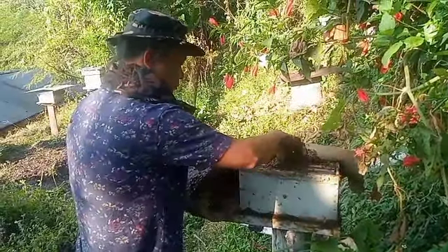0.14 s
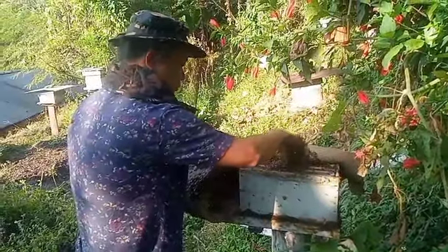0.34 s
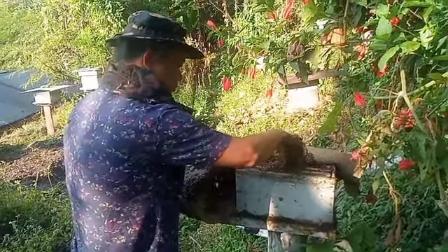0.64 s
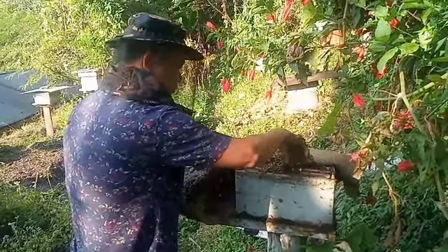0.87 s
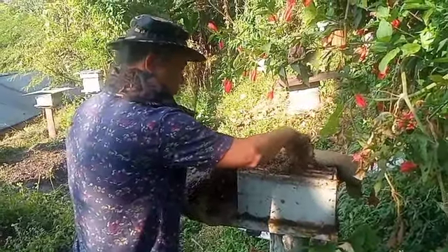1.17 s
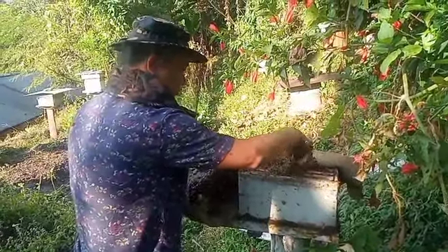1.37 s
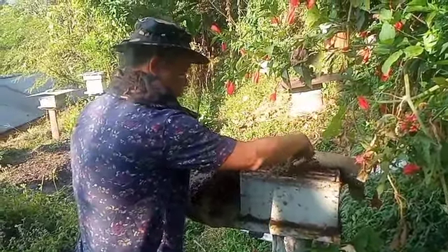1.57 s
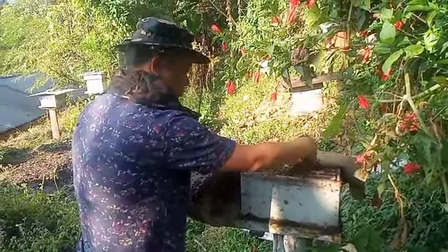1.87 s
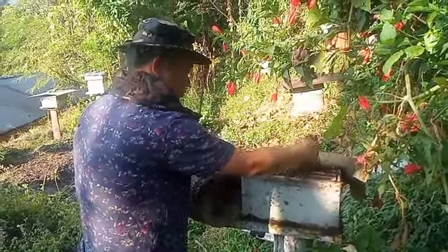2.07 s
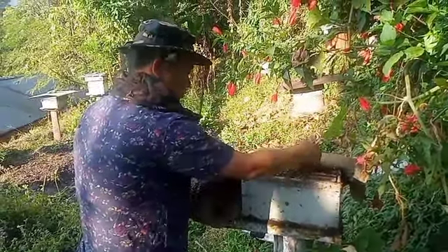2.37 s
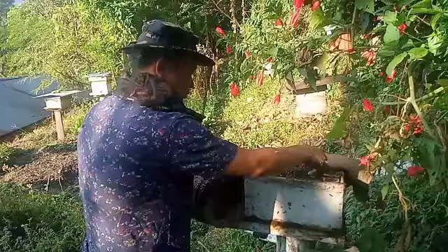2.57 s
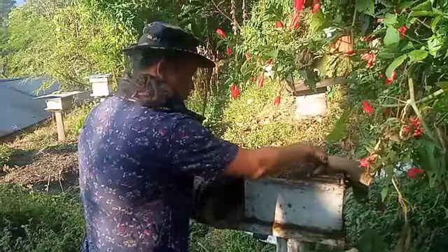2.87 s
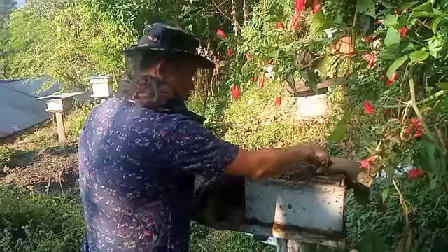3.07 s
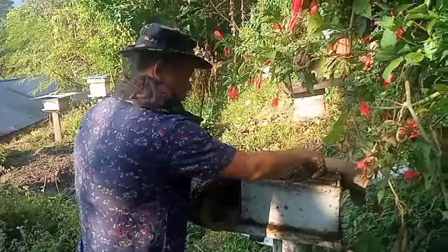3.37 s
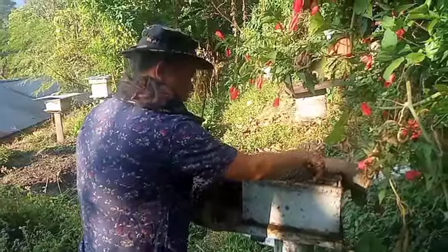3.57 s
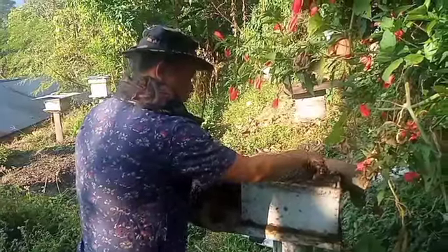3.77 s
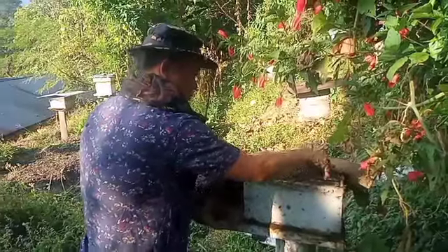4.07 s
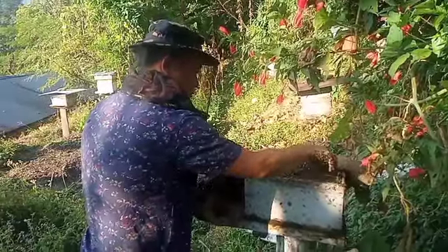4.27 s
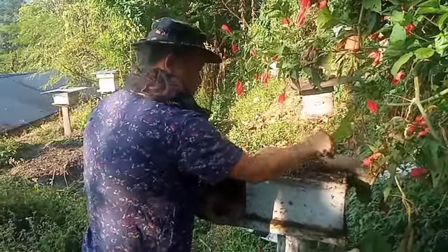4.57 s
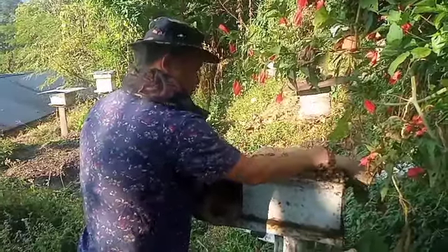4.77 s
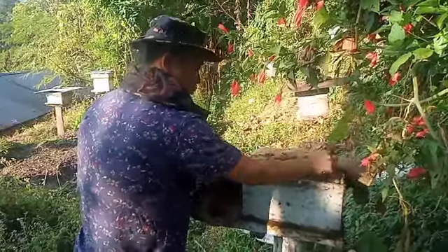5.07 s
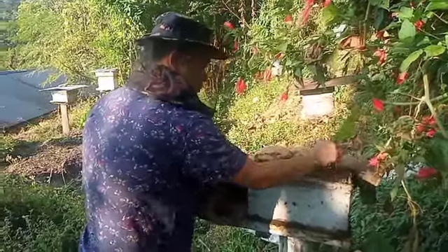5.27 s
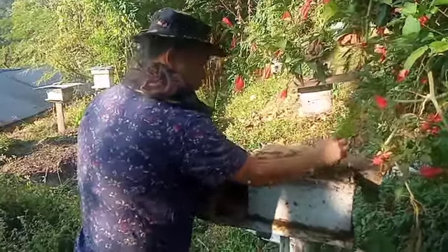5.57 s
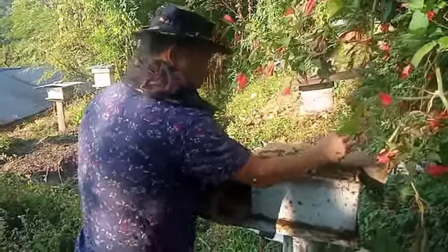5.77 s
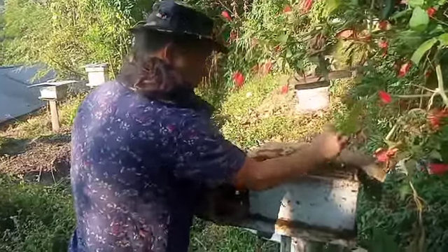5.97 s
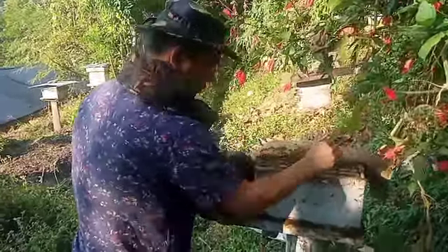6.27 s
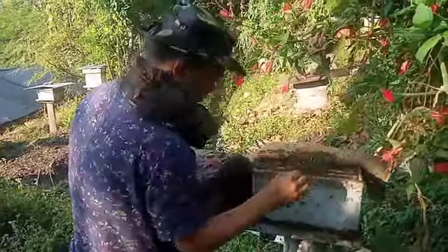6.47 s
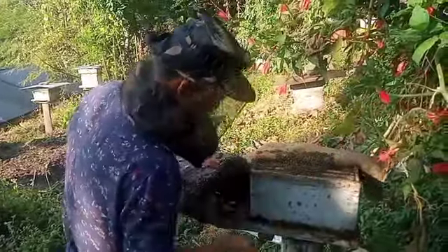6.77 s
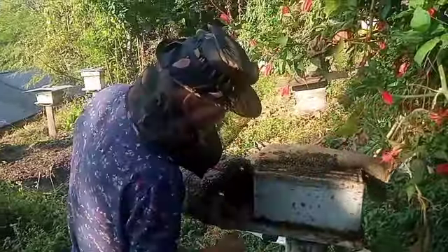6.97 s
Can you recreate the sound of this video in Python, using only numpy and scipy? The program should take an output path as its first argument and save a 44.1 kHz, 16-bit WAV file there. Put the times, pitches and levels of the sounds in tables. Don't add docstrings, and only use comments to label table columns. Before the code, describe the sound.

A large honeybee colony buzzes continuously around an open hive box in a garden. A deep wing drone throbs and wavers beneath a grainy mid hum and soft hiss. Thin birds whistle far off at the start, faint finger scuffs brush sacking, and an insect rasps once midway. More bird notes come late. Close outdoor mono sound, dull in the treble.

```python
import sys
import numpy as np
from scipy import signal
from scipy.fft import rfft, irfft, next_fast_len
from scipy.io import wavfile
from scipy.ndimage import uniform_filter1d

SR = 44100
rng = np.random.default_rng(int(sys.argv[2]) if len(sys.argv) > 2 else 0)


def dump(signal):
    limited = np.clip(np.atleast_2d(signal).T, -1, 1)
    pcm = np.round(limited * 32767).astype(np.int16)
    wavfile.write(sys.argv[1], SR, pcm)


def decibels_to_gain(level_db):
    exponent = np.asarray(level_db, float) / 20
    return 10 ** exponent


N = 314433
T = np.arange(N) / SR


def level(x, db):
    return x * decibels_to_gain(db) / np.sqrt(np.mean(x ** 2))


def columns(table):
    s, *rest = np.transpose(table)
    return [np.interp(T, s, column) for column in rest]


def colour(x, points, edge=2048):
    hz, db = np.transpose(points)
    size = next_fast_len(N + 2 * edge)
    log_hz = np.log(np.arange(size // 2 + 1) * SR / size + 1)
    gain = decibels_to_gain(np.interp(log_hz, np.log(hz), db))
    padded = np.pad(x, edge, "reflect")
    return irfft(rfft(padded, size) * gain, size)[edge:edge + N]


def walk(rate):
    knots = rng.standard_normal(int(N / SR * rate) + 3)
    joined = np.interp(T * rate, np.arange(len(knots)), knots)
    return 1.3 * uniform_filter1d(joined, int(SR / rate / 2))


def tone(hz):
    return np.sqrt(2) * np.cos(2 * np.pi * np.cumsum(hz) / SR)


# start_s [s], pitch_hz [Hz]
WING_BEAT = [(0, 92.4), (3, 91.2), (5, 90.5), (6, 89.4), (7.13, 89.2)]
# multiple [of the beat], front_db [dB], rear_db [dB]
WING_PARTIALS = [(1.0, -43.8, -35.8), (2.0, -35.3, -39.3), (3.0, -45.6, -41.1), (4.0, -52.9, -51.2),
                 (5.0, -66.4, -62.2)]
# start_s [s], level_db [dB], effort_db [dB per partial]
FRONT_HALF = [(0.0, 9.2, -9.7), (0.52, 5.8, -5.6), (0.78, -3.5, 9.2), (1.16, 6.7, -8.1), (1.72, 0.0, -15.1),
              (2.23, 4.2, -3.6), (2.67, -2.4, -3.7), (3.07, 2.0, 2.9), (3.66, -5.7, -5.3),
              (3.96, 0.9, -1.2), (4.25, -6.3, 4.6), (4.74, -1.2, 4.1), (5.35, -21.4, 16.7),
              (5.85, 0.9, -2.5), (6.08, 0.7, 2.8), (6.56, 7.0, 2.4), (6.84, -0.4, 9.7), (7.13, 3.8, 2.1)]
# start_s [s], lag [strokes], level_db [dB], effort_db [dB per partial]
REAR_HALF = [(0.0, -0.478, 7.6, -6.3), (0.27, -0.474, 2.2, 0.4), (0.97, -0.081, -0.6, -3.2),
             (1.42, 0.029, -14.7, 10.1), (1.69, 0.314, 6.0, 0.9), (2.03, 0.455, 1.7, -5.0),
             (2.48, 0.625, -0.2, -1.0), (3.12, 0.935, -3.9, -9.1), (3.55, 1.211, 0.9, 1.6),
             (3.79, 1.336, -0.0, -2.2), (4.29, 1.551, -5.4, 6.2), (4.92, 1.811, 1.7, -2.5),
             (5.14, 2.057, 4.5, -1.7), (5.84, 2.245, -0.5, -0.1), (5.97, 2.261, -4.2, -6.7),
             (6.43, 2.601, -1.1, 6.1), (6.83, 2.727, 4.8, 6.4), (7.13, 2.95, -1.8, 7.2)]


def cluster(slip_hz=0.787, flutter_db=0.25):
    beat_hz, = columns(WING_BEAT)
    front_db, front_effort = columns(FRONT_HALF)
    lag, rear_db, rear_effort = columns(REAR_HALF)
    out = 0
    for k, front, rear in WING_PARTIALS:
        turn = 2 * np.pi * np.cumsum(k * beat_hz + slip_hz * walk(7)) / SR
        step = min(k, 4) - 2
        front_wings = decibels_to_gain(front + front_db + step * front_effort) * np.cos(turn)
        rear_wings = decibels_to_gain(rear + rear_db + step * rear_effort) * np.cos(turn - 2 * np.pi * k * lag)
        out = out + np.sqrt(2) * (front_wings + rear_wings) * decibels_to_gain(flutter_db * k * walk(11))
    return out


# multiple [of the beat], level_db [dB]
STRAGGLER_PARTIALS = [(1, -48.5), (2, -41), (3, -52.5), (4, -55.5), (5, -52), (6, -58), (7, -56)]


def stragglers(count=6, low_hz=68.4, high_hz=88.2, drift=.03, patchy_db=4.0):
    out = 0
    for hz in np.linspace(low_hz, high_hz, count):
        turn = 2 * np.pi * np.cumsum(hz * (1 + drift * walk(5))) / SR
        wing = sum(decibels_to_gain(db) * np.sin(k * turn + 6 * rng.random()) for k, db in STRAGGLER_PARTIALS)
        out = out + decibels_to_gain(patchy_db * walk(6)) * wing
    return out / np.sqrt(count)


def fliers(count=12, low_hz=189.84, high_hz=268.84, drift=.04, near_db=3., air=1.68):
    out = air * rng.standard_normal(N)
    for hz in np.linspace(low_hz, high_hz, count):
        turns = np.cumsum(hz * (1 + drift * walk(3))) / SR + rng.random()
        strokes = np.flatnonzero(np.diff(np.floor(turns)))
        out[strokes] += 3.14 * decibels_to_gain(near_db * walk(3))[strokes]
    return out


# start_s [s], level_db [dB]
STIR_LEVEL = [(0, -48.5), (.5, -49.3), (1.5, -51), (2.3, -51), (3.4, -50), (4.3, -48.5), (4.9, -47.5),
              (5.6, -47.5), (6.4, -47.3), (7.13, -48)]
# start_s [s], level_db [dB]
STRAGGLER_NEARNESS = [(0.06, -37), (0.27, -47), (0.33, -38), (1.13, -46), (1.58, -39), (1.62, -42),
                      (3.46, -45), (3.67, -41), (4.75, -48), (5.88, -45), (5.99, -39), (6.31, -47),
                      (6.44, -41), (6.83, -41), (6.85, -48), (7.07, -41)]
# pitch_hz [Hz], level_db [dB per Hz]
RUMBLE_SPECTRUM = [(25, -23.5), (50, -18), (70, -7), (110, 1), (150, -2.5), (200, -10.5), (260, -30.5)]
# pitch_hz [Hz], level_db [dB per Hz]
HUM_SPECTRUM = [(150, -19), (200, -19), (250, 9.5), (320, 0), (420, -6.5), (560, 3.5), (630, -3),
                (700, -15), (900, -27)]
# pitch_hz [Hz], level_db [dB per Hz]
HISS_SPECTRUM = [(400, -20), (690, -5.5), (850, 6.5), (1000, 0), (1400, 4.5), (1900, -1.5), (2400, 0),
                 (3600, 1), (5000, 3)]
PATCH_EDGES = [850, 1200, 1500, 1800, 2200, 2600, 3100, 3700, 4600]
CALM_DB = -49.5
HUM_DB, HISS_DB, AIR_DB = -48.6, -50.2, -68.2
HUM_SHARE, HISS_SHARE, AIR_SHARE = 1.1, .85, .5
HOLLOW_SHARE = .9


def swarm(flicker_db=.6, patchy_db=1.1):
    stir = columns(STIR_LEVEL)[0] - CALM_DB
    rumble_db = np.minimum(columns(STRAGGLER_NEARNESS)[0], -40) - .6
    hum_db = HUM_DB + HUM_SHARE * stir + .7 * walk(4)
    hiss_db = HISS_DB + HISS_SHARE * stir
    air_db = AIR_DB + AIR_SHARE * stir

    wings = fliers()
    low_wings = level(colour(wings, RUMBLE_SPECTRUM), 0.37)
    rumble = (low_wings + decibels_to_gain(42.5) * stragglers()) * decibels_to_gain(rumble_db)
    hum = level(colour(wings, HUM_SPECTRUM), 3.07) * decibels_to_gain(hum_db + flicker_db * walk(9.3))

    hiss = level(colour(wings, HISS_SPECTRUM), 9.02)
    below = []
    for hz in PATCH_EDGES:
        lowpass = signal.butter(2, hz, fs=SR, output="sos")
        below.append(signal.sosfiltfilt(lowpass, hiss))
    parts = np.diff(below, axis=0, prepend=0)
    patches = sum(part * decibels_to_gain(patchy_db * walk(4) + 2 * flicker_db * walk(14)) for part in parts)
    patches = patches + parts[1] * (decibels_to_gain(HOLLOW_SHARE * stir) - 1)
    air = (hiss - below[-1]) * decibels_to_gain(air_db + 17.0 + flicker_db * walk(7))
    return rumble + hum + patches * decibels_to_gain(hiss_db) + air


# start_s [s], level_db [dB], low_hz [Hz], high_hz [Hz]
FINGER_SCUFFS = [
    (.755, -43.5, 600., 3300.),
    (2.494, -40, 1600., 3200.),
    (2.51, -38, 6500., 10500),
    (2.53, -45, 2700., 4300.),
    (3.375, -43, 2800., 4480),
    (6.792, -41, 2820, 8000.),
]
SCUFF_RISE_S, SCUFF_DECAY_S = .014, .027
# start_s [s], level_db [dB], low_hz [Hz], high_hz [Hz]
PALM_SLIDES = [
    (3.24, -40, 5100, 16000.),
    (3.67, -35.5, 5560, 16000.),
    (4.14, -34.5, 6000., 16000.),
    (4.71, -33.5, 7500., 16000.),
    (4.87, -42, 5400, 16000.),
]
SLIDE_RISE_S, SLIDE_DECAY_S = .035, .17


def hand(grain_db=-0.5):
    grains = rng.standard_normal(N) * decibels_to_gain(grain_db * walk(170))
    strokes = ((FINGER_SCUFFS, SCUFF_RISE_S, SCUFF_DECAY_S), (PALM_SLIDES, SLIDE_RISE_S, SLIDE_DECAY_S))
    out = 0
    for table, rise, decay in strokes:
        for s, db, low_hz, high_hz in table:
            sweep = np.exp(-np.where(T < s, ((s - T) / rise) ** 2, (T - s) / decay))
            band = [(low_hz / 2, -20), (low_hz, 0), (high_hz, 0), (high_hz * 2, -20)]
            out = out + sweep * level(colour(grains, band), db)
    return out


# start_s [s], pitch_hz [Hz], level_db [dB]
INSECT_RASP = [
    (3.46, 3880, -51),
    (3.59, 3700, -48.5),
    (3.66, 3620, -53),
    (3.78, 3580, -43),
    (3.87, 3590, -50),
    (4.04, 3520, -44),
    (4.15, 3570, -49),
    (4.27, 3610, -46),
    (4.36, 3600, -61),
]


def insect(click_hz=170., jitter=.22, ring_s=.0015, scatter_db=2.5, slip=.7, fade_s=.012):
    hz, db = columns(INSECT_RASP)
    to_edge_s = np.minimum(T - INSECT_RASP[0][0], INSECT_RASP[-1][0] - T)
    gate = np.clip(to_edge_s / fade_s, 0, 1)
    turns = np.cumsum(click_hz * (1 + jitter * walk(80))) / SR
    clicks = np.diff(np.floor(turns), prepend=0)
    chance = decibels_to_gain(scatter_db * rng.standard_normal(N)) * np.exp(2j * np.pi * slip * rng.random(N))
    ring = signal.lfilter([1], [1, -np.exp(-1 / (ring_s * SR))], clicks * chance)
    ring = uniform_filter1d(ring.real, size=16) + 1j * uniform_filter1d(ring.imag, size=16)
    rasp = (ring * np.exp(2j * np.pi * np.cumsum(hz) / SR)).real
    return level(rasp, 0) * decibels_to_gain(db) * gate


# start_s [s], length_s [s], start_hz [Hz], end_hz [Hz], level_db [dB]
BIRD_NOTES = [(.14, .045, 1900, 1900, -53), (.2, .04, 1900, 1900, -54), (.255, .1, 3640, 3580, -58),
              (.37, .06, 2760, 2920, -49), (.435, .065, 3000, 2990, -53), (.508, .025, 2880, 2930, -52),
              (.535, .055, 2960, 3020, -55.5), (.6, .045, 3250, 3650, -57), (.645, .065, 2600, 2600, -53.5),
              (1.035, .035, 1830, 1830, -54), (2.73, .05, 2950, 3020, -60), (2.78, .055, 2620, 2560, -59),
              (2.845, .14, 3160, 2830, -53), (5.04, .03, 3020, 2980, -55), (5.22, .11, 3020, 2950, -54),
              (6.18, .06, 2620, 2800, -55), (6.225, .085, 2930, 2990, -50.5), (6.425, .04, 2640, 2590, -51),
              (6.47, .12, 2500, 2620, -58)]
NOTE_EDGE = .22


def birds(flutter_db=1.5, waver_hz=20., near_db=1.5):
    out = np.zeros(N)
    waver = waver_hz * walk(60)
    for s, length, start_hz, end_hz, db in BIRD_NOTES:
        span = slice(int(s * SR), int((s + length) * SR))
        along = (T[span] - s) / length
        gate = np.clip(np.minimum(along, 1 - along) / NOTE_EDGE, 0, 1)
        glide_hz = start_hz + (end_hz - start_hz) * np.sin(np.pi / 2 * along) ** 2
        out[span] += gate * decibels_to_gain(db) * tone(glide_hz + waver[span])
    return decibels_to_gain(near_db + flutter_db * walk(65)) * out


def scene():
    return (cluster() + swarm() + hand() + insect() + birds())[None]


def low_pass(x):
    return signal.sosfilt(signal.butter(12, 15500, fs=SR, output="sos"), x)


# pitch_hz [Hz], level_db [dB]
MIC_RESPONSE = [(3700, 0), (4200, -8), (4600, -12), (5000, -18), (5600, -24), (6200, -21), (7200, -23),
                (7800, -33), (9200, -36), (10500, -40), (12200, -44), (13600, -39), (15500, -40)]


def record(dry):
    mix = colour(dry[0], MIC_RESPONSE)[None]
    return low_pass(mix)


dry = scene()
out = record(dry)
dump(out)
```